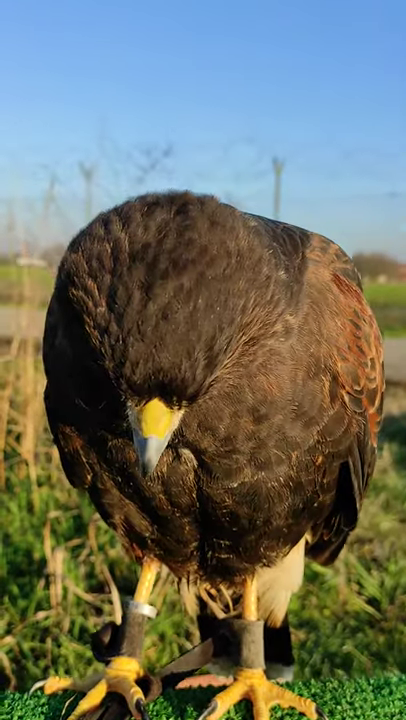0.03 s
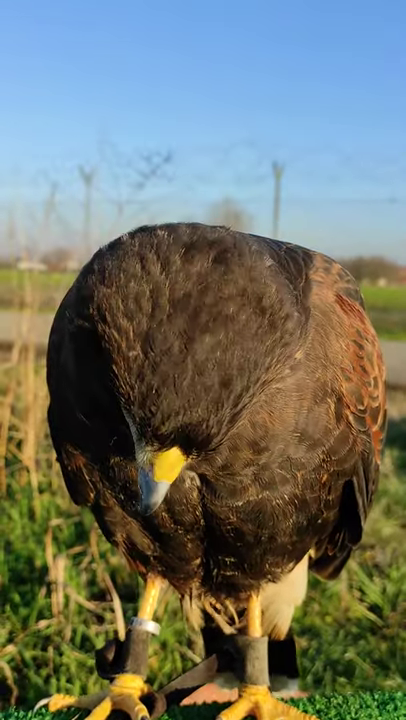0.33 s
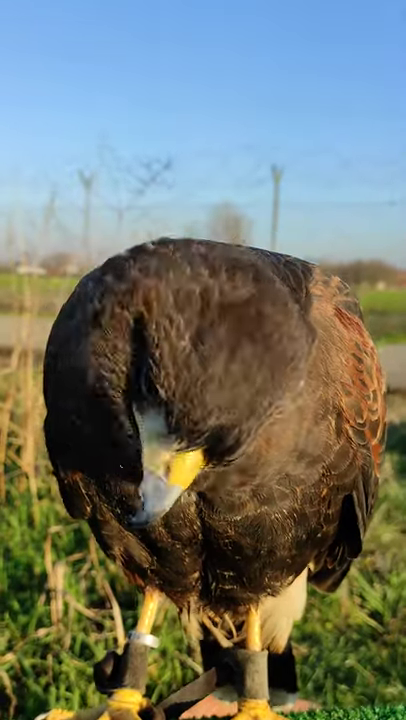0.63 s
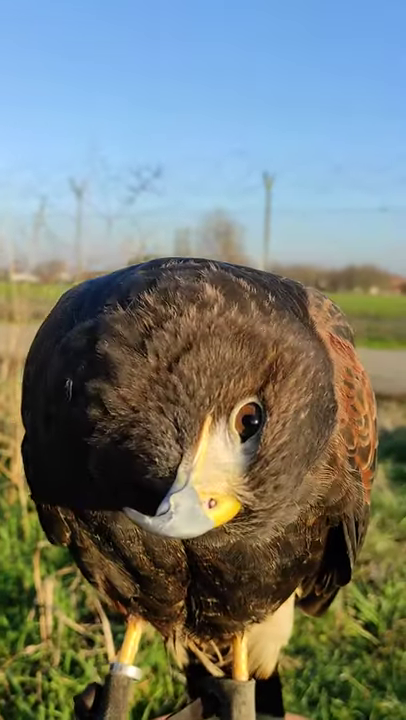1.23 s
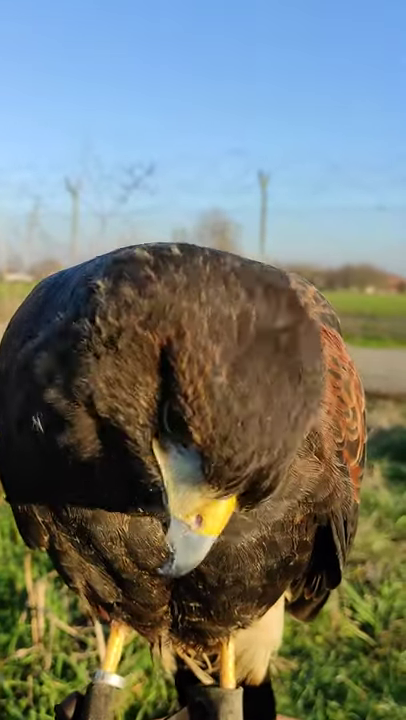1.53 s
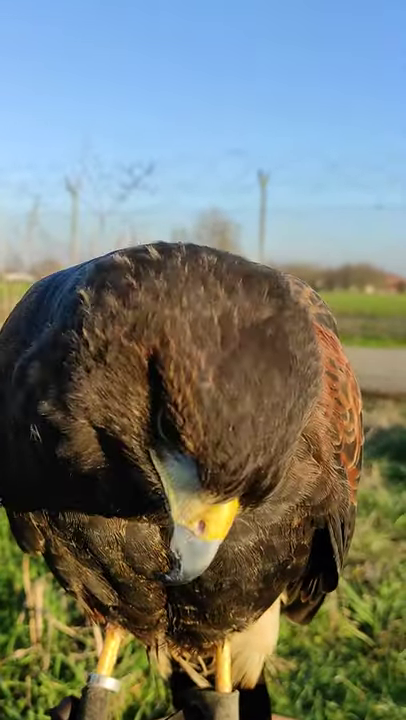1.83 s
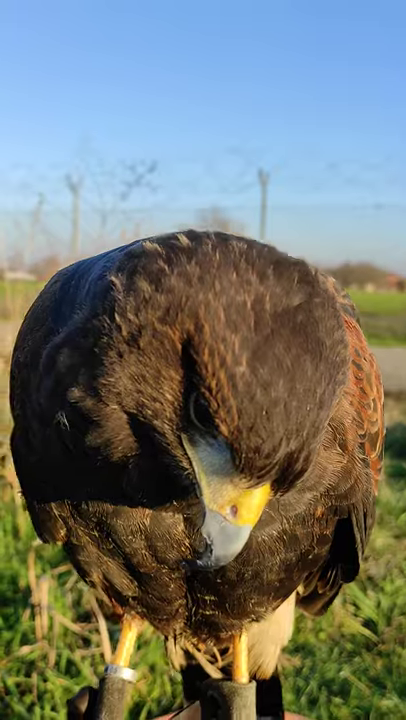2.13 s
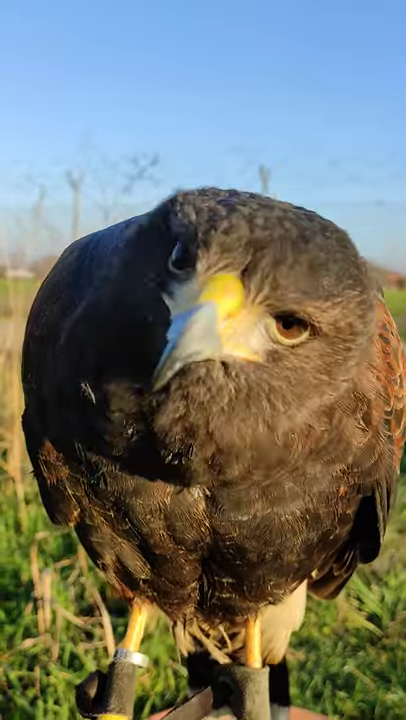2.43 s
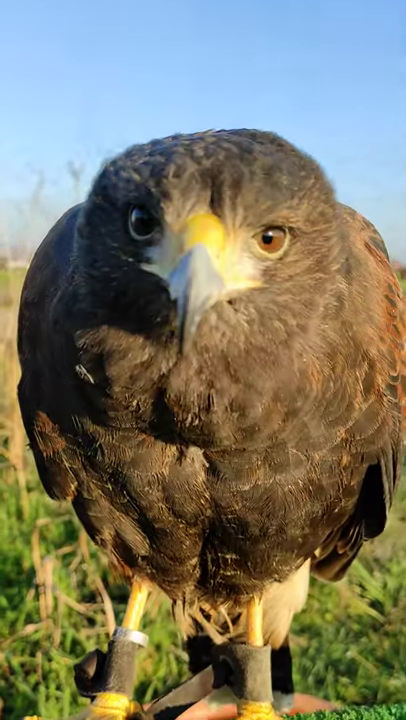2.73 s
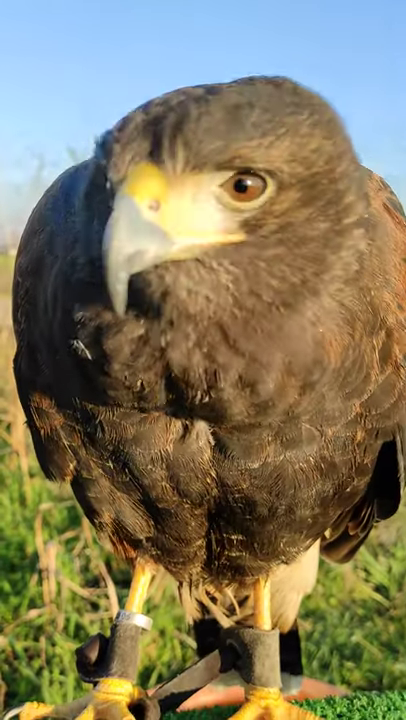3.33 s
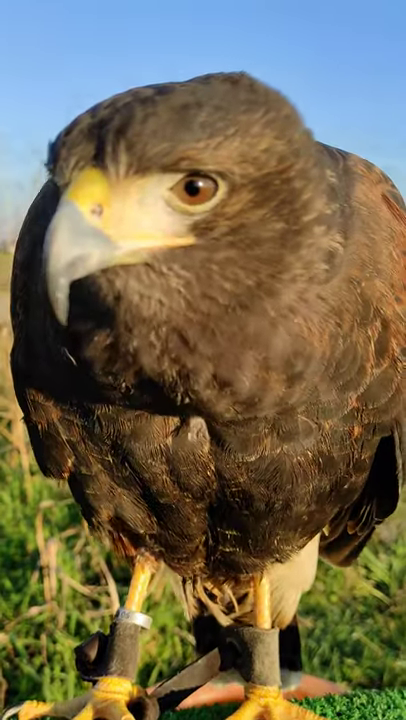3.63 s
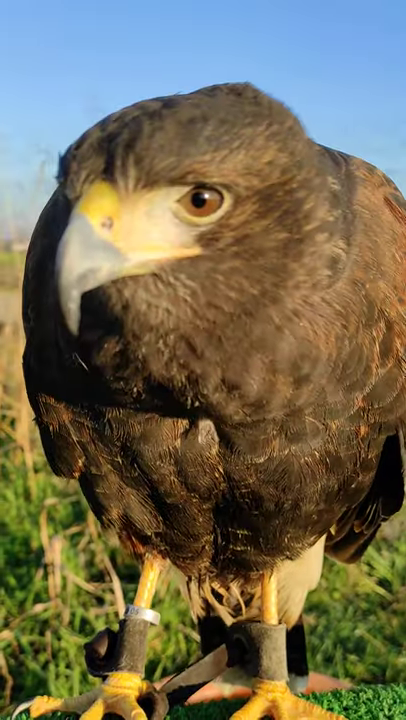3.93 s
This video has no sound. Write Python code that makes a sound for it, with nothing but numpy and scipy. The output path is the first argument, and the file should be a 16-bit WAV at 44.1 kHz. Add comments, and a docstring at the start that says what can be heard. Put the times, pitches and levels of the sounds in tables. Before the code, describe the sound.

Four raspy, nasal hawk calls sound up close outdoors, about a second apart. Something dry rustles on the left early on, and a brief squeak and soft hollow knocks follow the last call. A low rumble and faint hiss lie underneath.

```python
"""A hawk begging in an open field

A very close hawk gives four hoarse calls, made of uneven pulses that ring its throat and beak.
The later calls firm up and rise in pitch near their end. At first something dry rustles by the
left microphone. A tiny double click comes midway, then late on a thin squeak from the right
and a few soft, hollow knocks. A low distant rumble and a faint hiss lie under it all."""
import sys
import numpy as np
from scipy import signal
from scipy.fft import rfft, irfft, next_fast_len
from scipy.io import wavfile
from scipy.ndimage import map_coordinates

SR = 44100
rng = np.random.default_rng(int(sys.argv[2]) if len(sys.argv) > 2 else 0)


def wav_out(sig):
    """Save sig, one row per channel (or a flat mono array), as 16-bit PCM at SR to the path in sys.argv[1]."""
    wavfile.write(sys.argv[1], SR, np.round(np.clip(np.atleast_2d(sig).T, -1, 1) * 32767).astype(np.int16))


N = 176400  # 4 seconds


def hawk():
    """A rough rasp gives way to a firm voice as roughness falls; both ring the throat and beak."""
    # one table per call: (time [s], pulse rate [Hz], level [dB], roughness [1 or more = all rasp])
    calls = [
        [(0, 204, -47.5, 1), (.05, 204.3, -43.5, 0.92), (.115, 209, -49, 0.85), (.17, 196, -62, .8)],
        [(.8, 193.5, -75, 1.1), (.836, 184.1, -53, 0.8), (.89, 195.7, -47.5, 0.88), (1.13, 193, -43, 0.87),
         (1.17, 195.8, -42.5, 0.38), (1.21, 206.6, -42, 0.3), (1.255, 206.6, -45, 0.6), (1.305, 193, -58, 0.9)],
        [(1.912, 189.3, -77, .8), (1.94, 188.7, -51, .85), (2, 192.2, -45, 0.8), (2.15, 197.7, -43.5, 0.67),
         (2.185, 199.4, -42, 0.37), (2.225, 214.5, -43, 0.05), (2.29, 231.7, -41, 0.1),
         (2.333, 235.5, -39.5, 0), (2.35, 226, -43.5, 0.77), (2.385, 212.7, -54.5, 1), (2.45, 203, -63, 1.1)],
        [(3.008, 194.7, -69, .8), (3.025, 196.6, -54, 0.65), (3.08, 202.8, -44, 0.72), (3.19, 202.4, -42, 0.82),
         (3.21, 205.3, -43, 0.3), (3.29, 218.5, -41.5, 0.37), (3.32, 234.1, -39, 0.3),
         (3.345, 239.3, -37.5, .47), (3.37, 281, -40, 1.04), (3.395, 319.5, -38, 0.77),
         (3.425, 318.8, -37, 0.54), (3.45, 298.8, -45.5, 0.86), (3.52, 240.4, -63, 1.2)],
    ]
    # how far each call shifts the tones of throat and beak: (frequency factor [ratio])
    beak_stretch = [0.97, 0.981, 1.002, 1.026]
    out = np.zeros((2, N))
    for call, stretch in zip(calls, beak_stretch):
        hz, db, rough, on = curves(call)
        rough = np.clip(rough, 0, 1)
        wavering_hz = hz * (1 + .003 * wobble(80))
        firm = amp(-5) * np.sqrt(1 - rough ** 2) * firm_voice(wavering_hz, on)
        voice = throat_ring(amp(db) * (firm + rasp(hz, rough, on)))
        out += filtered(voice, lambda f: throat_and_beak(f / stretch))
    return out


def firm_voice(hz, on):
    """An even vibration makes a clean, nasal tone out of harmonics (multiples of the pitch)."""
    # strength of the harmonics: (harmonic [number], level [dB])
    harmonics = [(3, 2), (4, 4.5), (5, -2), (6, 3.5), (8, -0.5), (10, -2), (30, -6)]
    orders = np.arange(1, 45)
    phase = 2 * np.pi * np.cumsum(hz[on]) / SR + .06 * wobble(250)[on]
    waves = np.cos(orders[:, None] * phase + rng.standard_normal((len(orders), 1)))
    voice = np.zeros(N)
    voice[on] = unit(amp(along(harmonics, orders)) @ waves)
    return voice


def rasp(hz, rough, on):
    """Uneven throat pulses rattle, and each lets out a puff of hissing air."""
    # tone colour of the pulses: (frequency [Hz], level [dB])
    pulse_colour = [(900, 4), (2500, -3.5), (5000, -2), (9000, -26.5)]
    # tone colour of the air: (frequency [Hz], level [dB])
    air_colour = [(800, -15), (2600, 6.5), (7000, -1)]
    pulses = throat_pulses(hz, on)
    decay = np.exp(-.78 * hz[on].mean() / SR)  # a puff falls by about half in one cycle
    puffs = signal.lfilter([1], [1, -decay], pulses)
    puffs /= np.sqrt(np.mean(puffs[on] ** 2))
    air_db = -4 - 8 * (1 - rough)  # a firm voice is less breathy
    air = amp(air_db) * puffs * rng.standard_normal(N)
    return coloured(rough * pulses, pulse_colour) + coloured(air, air_colour)


def throat_pulses(hz, on, jitter_cycles=.22, scatter_db=.5):
    """One pulse per cycle, each a little off in time and size, which sounds hoarse."""
    cycles = np.cumsum(hz * on) / SR
    count = np.arange(1, int(cycles[-1]))
    time_chance, size_chance = rng.standard_normal((256, 2))[:len(count)].T
    even_at = np.searchsorted(cycles, count)
    period = SR / hz[even_at]
    size = amp(-scatter_db * size_chance) * np.sqrt(period)
    uneven_at = np.rint(even_at + jitter_cycles * time_chance * period).astype(int)
    train = np.bincount(np.clip(uneven_at, 0, N - 1), size, N)
    return train / np.sqrt(np.mean(train[on] ** 2))


def throat_ring(x, width_hz=156, ring_db=1.5):
    """Add the throat's main ringing tone, which climbs as the voice firms up."""
    # path of that tone: (time [s], frequency [Hz])
    glide = [(0, 1120), (1.1, 1050), (1.22, 1301), (1.28, 1040), (2.16, 1150), (2.27, 1450), (2.33, 1600),
             (2.355, 1144), (3.19, 1150), (3.32, 1340), (3.38, 1200)]
    hz, _ = curves(glide)
    carrier = np.exp(2j * np.pi * np.cumsum(hz) / SR)
    decay = np.exp(-np.pi * width_hz / SR)
    # slide the tone down to 0 Hz, smooth away the rest, slide it back up
    ring = carrier * signal.lfilter([1 - decay], [1, -decay], x / carrier)
    return x + amp(ring_db) * 2 * np.real(ring)


def throat_and_beak(hz):
    """Throat and open beak boost some frequencies; each microphone hears this a little differently."""
    # their tone colour: (frequency [Hz], left level [dB], right level [dB])
    colour = [(300, -45, -45), (560, -23, -24), (720, -14, -15), (900, -3, -4), (1650, -2, -6),
              (2130, -6, -11), (2400, -3, -13), (2800, -1, 2), (3130, -14, -7), (3430, -10, -5),
              (3630, -3, 1), (3850, -6, -6), (4550, -6, -11), (4920, 3, -4), (5450, 0, -3), (6300, -10, -7),
              (7150, 2, 7), (7700, -6, -6), (8300, -12, -17), (9050, -12, -14), (9700, -37, -37),
              (15500, -42, -42)]
    # how far the left wave runs ahead of the right: (frequency [Hz], lead [radians])
    left_lead = [(2050, 0.26), (2600, -1.5), (3600, -5), (4400, -5.5), (6150, -8), (6900, -5)]
    gains = amp([along(colour, hz, column=1), along(colour, hz, column=2)])
    common = np.sqrt(gains[0] * gains[1])
    phase_shift = np.exp(.5j * along(left_lead, hz) * np.array([[1], [-1]]))
    return unit(gains) / common * causal(common) * phase_shift


def near_echo(x, fade_s=.018, above_hz=2600):
    """The treble of a call bounces off the camera and the perch within a few milliseconds."""
    t = np.arange(SR // 32) / SR
    tail = rng.standard_normal((2, len(t))) * amp(-60 * t / fade_s)
    echo = signal.fftconvolve(x, tail / np.linalg.norm(tail[0]), axes=1)[:, :N]
    return amp(-6) * filtered(echo, lambda hz: hz ** 2 / (hz ** 2 + above_hz ** 2))


def field_echo(x, fade_s=.6, below_hz=5000):
    """The surroundings scatter back a faint, dull echo."""
    t = np.arange(SR // 2) / SR
    tail = rng.standard_normal((2, len(t))) * amp(-60 * t / fade_s) * (1 - np.exp(-t / .0014))
    echo = signal.fftconvolve(x[:1], tail / np.linalg.norm(tail[0]), axes=1)[:, :N]
    return amp(-14) * filtered(echo, lambda hz: 1 / (1 + (hz / below_hz) ** 2))


def rustle():
    """Dry, crackly scuffs close to the left microphone; the first one jolts the camera case."""
    # the scuffs: (time [s], level [dB], rise time [s], time to fade by 60 dB [s])
    scuffs = [(.003, -22.5, 0.002, 0.018), (.0095, -18, 0.0013, 0.021), (0.027, -37.5, 0.0016, .12),
              (0.149, -35.5, 0.0016, 0.016), (0.196, -42.5, 0.0048, 0.078), (0.3341, -30.5, 0.0018, 0.027),
              (0.365, -34, .001, 0.016), (0.377, -46.5, 0.0066, 0.27), (0.486, -36.5, 0.0039, 0.04),
              (.517, -36, .003, 0.1), (.533, -34, 0.0036, 0.073), (0.574, -37.5, .005, 0.042),
              (0.602, -30.5, 0.00089, 0.013), (0.616, -38.5, 0.0046, 0.089)]
    # tone colour of the jolted case: (frequency [Hz], level [dB])
    case_colour = [(400, -18), (1300, -16.5), (1750, 2), (4000, -29.5)]
    level = np.sqrt(sum((amp(db) * burst(s, rise, fade)) ** 2 for s, db, rise, fade in scuffs))
    scuffing = level * np.array([crackle(), crackle()]) * sides(right_db=-13)
    bump = amp(-34.5) * burst(.01, rise_s=.0087, fade_s=.048) * noise(case_colour)
    return scuffing + bump * sides(right_db=-6)


def crackle(snaps_per_s=4000, spread_db=3, snap_share=.75):
    """Thousands of tiny dry snaps over a fine hiss."""
    # tone colour of both: (frequency [Hz], level [dB])
    colour = [(200, -28), (1700, -14.5), (3200, -27.5), (5000, -18.5), (6800, -7.5), (8000, 7), (9000, -1),
              (10100, -26), (11500, -16.5), (15500, -14.5)]
    hits = rng.random(N) < snaps_per_s / SR
    sizes = amp(spread_db * np.clip(rng.standard_normal(N), -2, 2))
    snaps = unit(coloured(hits * sizes * rng.choice([-1, 1], N), colour))
    return np.sqrt(snap_share) * snaps + np.sqrt(1 - snap_share) * noise(colour)


def double_click():
    """Two tiny bursts of bright noise near the left microphone."""
    # the clicks: (time [s], level [dB])
    clicks = [(1.6194, -43.5), (1.622, -46)]
    level = sum(amp(db) * burst(s, rise_s=.00022, fade_s=.0095) for s, db in clicks)
    return level * noise(colour=[(4000, -13), (8000, 13), (15000, -18)]) * sides(right_db=-13)


def squeak():
    """A thin whistle that arches up and down on the right, with its octave and some air."""
    # path of the whistle: (time [s], pitch [Hz], level [dB])
    arch = [(3.635, 4490, -74), (3.668, 4510, -64), (3.675, 4340, -46), (3.689, 4834, -38),
            (3.704, 4744, -34), (3.714, 4440, -35.5), (3.723, 3860, -35.5), (3.728, 3330, -52)]
    # tone colour of the air: (frequency [Hz], level [dB])
    air_colour = [(2500, -26), (5000, -7), (10500, -12), (13000, -52)]
    hz, db, on = curves(arch)
    phase = 2 * np.pi * np.cumsum(hz * (1 + .0024 * wobble(1400))) / SR
    tone = np.sqrt(2) * (np.sin(phase) + amp(-12.5) * np.sin(2 * phase))
    level = on * amp(db + 1.03 * wobble(200))
    air = amp(-13.5) * noise(air_colour)
    return level * (tone * sides(left_db=-19.5) + air * sides(left_db=-6))


def knocks(rise_s=.0012, tick_fade_s=.017, left_lag_s=.00026):
    """A quick stumble of soft contacts, each a tick and a short hollow ring."""
    # the contacts: (time [s], relative level [dB])
    contacts = [(3.728, -36.5), (3.733, -30.5), (3.739, -33.5), (3.744, -31.5), (3.748, -36), (3.761, -31),
                (3.769, -44), (3.78, -45.5)]
    # tones of the ring: (frequency [Hz], relative level [dB], time to fade by 60 dB [s])
    hollow_tones = [(231, -14.5, 0.117), (300.3, -9.5, 0.088), (393, -8.5, 0.086), (480, -6, 0.054),
                    (585, -1, 0.045), (680, -0.5, 0.051), (944, -12, 0.093), (1745, 5, 0.017)]
    out = np.zeros((2, N + SR))
    t = np.arange(SR // 6) / SR
    for s, db in contacts:
        ring = np.zeros(len(t))
        for hz, tone_db, fade_s in hollow_tones:
            level = amp(tone_db + rng.normal(0, 1) - 60 * t / fade_s)
            detuned_hz = hz * (1 + rng.normal(0, .019))
            ring += level * np.sin(2 * np.pi * (detuned_hz * t + rng.random()))
        ring *= 1 - np.exp(-t / rise_s)
        soft_noise = signal.lfilter([.5], [1, -.5], rng.standard_normal((2, len(t))))
        tick = soft_noise * amp(-2.5 - 60 * t / tick_fade_s)
        start = round(s * SR)
        out[:, start:start + len(t)] += amp(db - 2.5) * (ring + tick)
    delay_s = np.array([[.5], [-.5]]) * left_lag_s
    # the left side hears them later, and the highest treble is cut
    return filtered(out[:, :N], lambda hz: np.exp(-2j * np.pi * hz * delay_s) / (1 + (hz / 10000) ** 12))


def rumble():
    """Low distant noise that swells gently; its deepest part is most alike on both sides."""
    # tone colour: (frequency [Hz], level [dB])
    colour = [(15, -40), (25, 1), (92, -6.5), (127, -9.5), (265, -10), (471, -18.5), (1550, -23),
              (2690, -36), (6000, -44.5), (13200, -120)]
    # how alike left and right are: (frequency [Hz], likeness [0 to 1])
    likeness = [(60, 0.82), (500, 0.63), (1600, 0.41), (4000, 0)]
    shared = filtered(noise(colour), lambda hz: np.sqrt((1 + along(likeness, hz)) / 2))
    opposed = filtered(noise(colour), lambda hz: np.sqrt((1 - along(likeness, hz)) / 2))
    level = amp(-58.5 + .99 * wobble(4.57))
    return level * np.array([shared + opposed, shared - opposed]) * sides(left_db=3, right_db=-3)


def hiss():
    """A fine, high hiss that flickers and fades away."""
    # its course: (time [s], level [dB])
    fade = [(0, -51), (.5, -58), (.78, -65.5), (1.35, -61), (1.8, -65.5), (4, -74)]
    # tone colour: (frequency [Hz], level [dB])
    colour = [(5000, -13.5), (6800, -7), (8100, 3.5), (9000, -5.5), (10000, -25.5), (12500, -18),
              (15500, -38.5)]
    db, _ = curves(fade)
    flicker_db = 1.67 * wobble(25.21) + 2.1 * wobble(500)
    return amp(db + flicker_db) * np.array([noise(colour), noise(colour)]) * sides(right_db=-4)


def amp(db):
    """Turn decibels into a factor to multiply by."""
    return 10 ** (np.asarray(db) / 20)


def sides(left_db=0, right_db=0):
    """Factors that place a sound between left and right."""
    return amp([[left_db], [right_db]])


def unit(x):
    """Scale to an average strength (rms) of 1."""
    return x / np.sqrt(np.mean(x ** 2) + 1e-20)


def along(points, hz, column=1):
    """Read between a table's rows, with frequency spaced by octaves."""
    table = np.transpose(points)
    return np.interp(np.log(hz + 1), np.log(table[0] + 1), table[column])


def curves(rows):
    """Turn a timed table into one curve per column, plus a flag that is on from first row to last."""
    times, *columns = np.transpose(rows)
    t = np.arange(N) / SR
    on = (t >= times[0]) & (t <= times[-1])
    return [np.interp(t, times, column) for column in columns] + [on]


def wobble(per_s):
    """A smooth curve through this many random points a second."""
    return map_coordinates(rng.standard_normal(int(N * per_s / SR) + 4), [np.arange(N) * per_s / SR])


def burst(peak_s, rise_s, fade_s):
    """A level that swells to its peak, then drops 60 dB in fade_s."""
    t = np.arange(N) / SR - peak_s
    return np.exp(np.maximum(np.minimum(t / rise_s, -np.log(1000) * t / fade_s), -20))


def filtered(x, response):
    """Scale and delay each frequency in x as response(hz) says."""
    size = 2 * next_fast_len(N // 2 + SR // 4)
    return irfft(rfft(x, size) * response(np.fft.rfftfreq(size, 1 / SR)), size)[..., :N]


def causal(gain):
    """A filter response with this gain that rings only after its cause."""
    c = irfft(np.log(np.maximum(gain, 1e-6)))
    half = len(c) // 2
    return np.exp(rfft(np.r_[c[0], 2 * c[1:half], c[half], np.zeros(half - 1)]))


def coloured(x, colour):
    """Give x a tone colour while keeping its onsets sharp."""
    return filtered(x, lambda hz: causal(amp(along(colour, hz))))


def noise(colour):
    """Noise of strength 1 with a tone colour of (frequency [Hz], level [dB]) rows."""
    return unit(filtered(rng.standard_normal(N), lambda hz: amp(along(colour, hz))))


def scene():
    """The hawk and its echoes, the small sounds near it, and the background."""
    calls = hawk()
    bird = calls + near_echo(calls) + field_echo(calls)
    return bird + rustle() + double_click() + squeak() + knocks() + rumble() + hiss()


def record(dry):
    """The camera keeps nothing above 15800 Hz."""
    return filtered(dry, lambda hz: hz < 15800)


dry = scene()
out = record(dry)
wav_out(out)
```